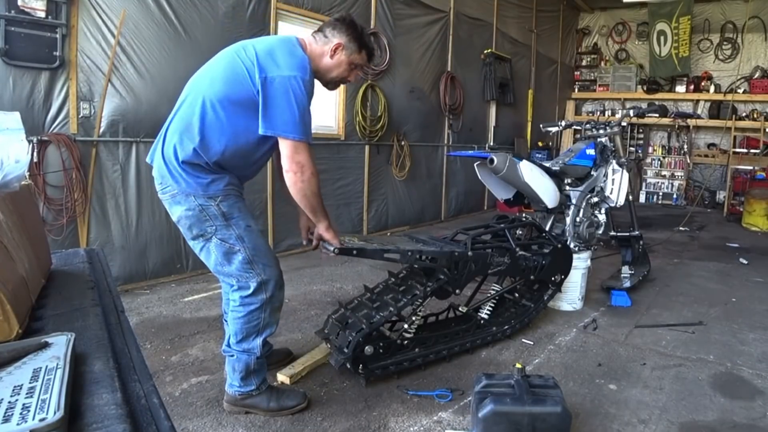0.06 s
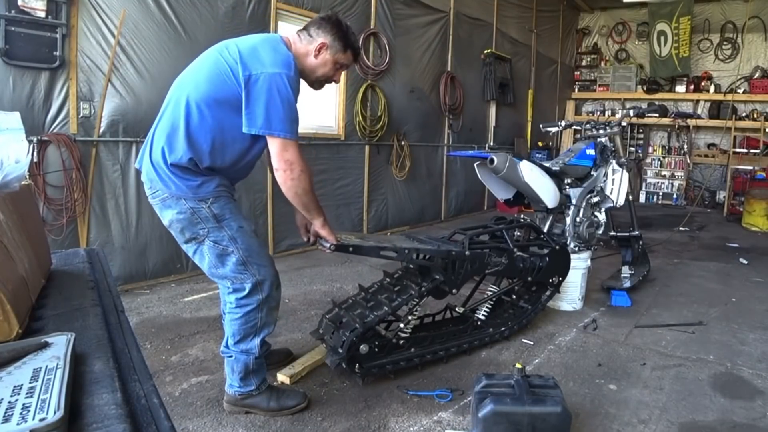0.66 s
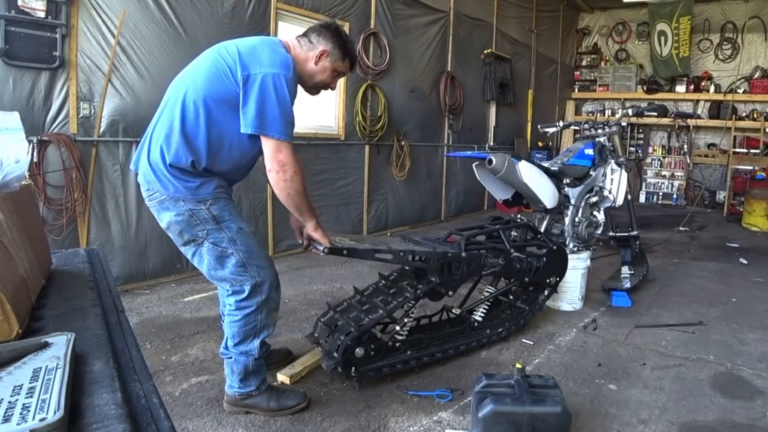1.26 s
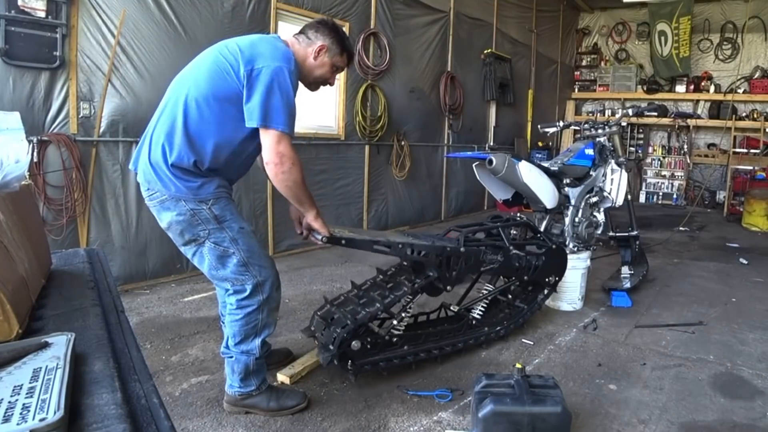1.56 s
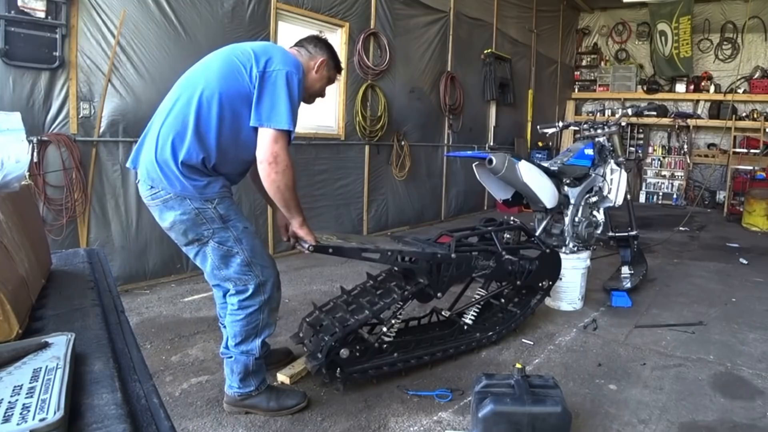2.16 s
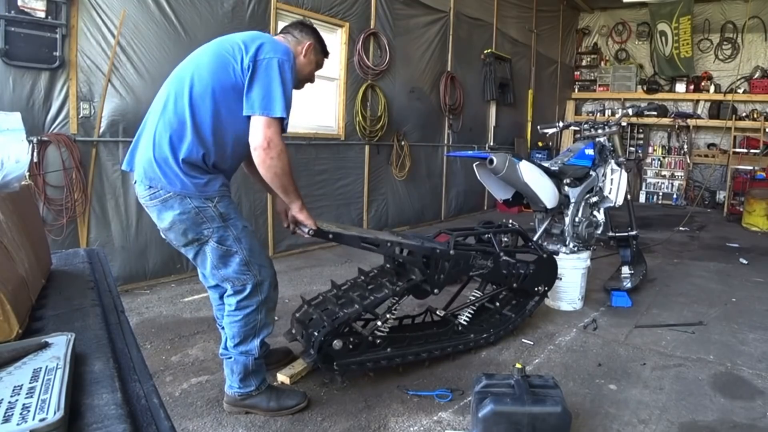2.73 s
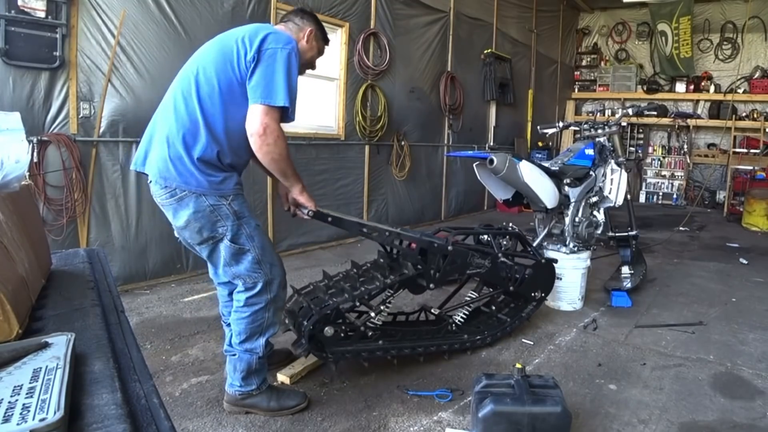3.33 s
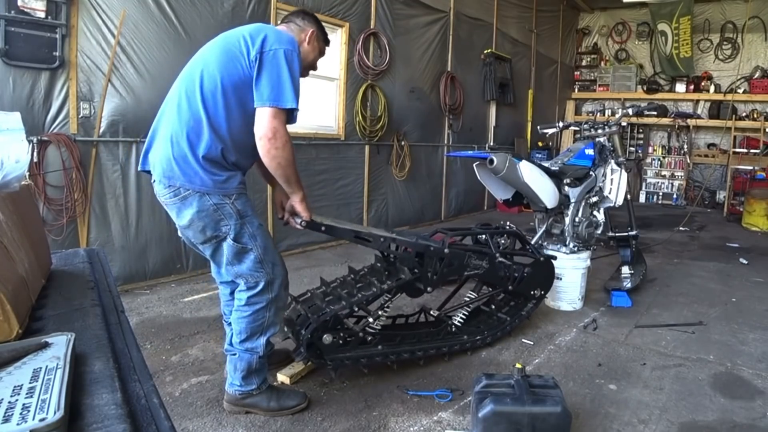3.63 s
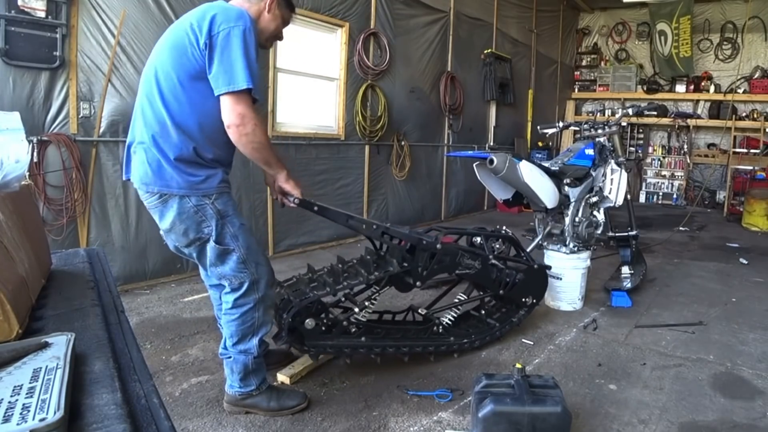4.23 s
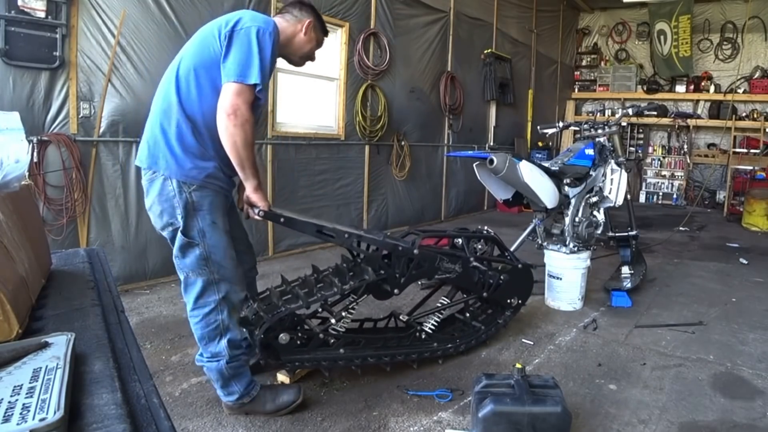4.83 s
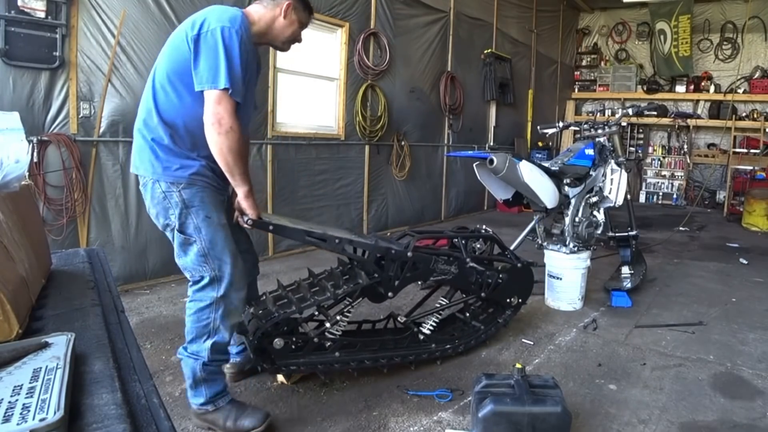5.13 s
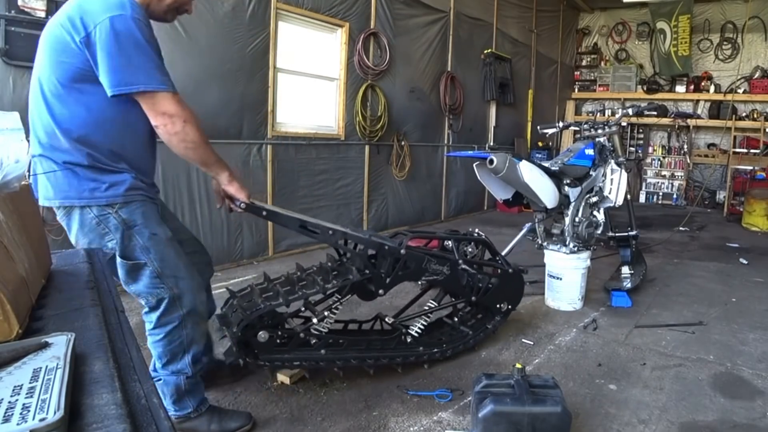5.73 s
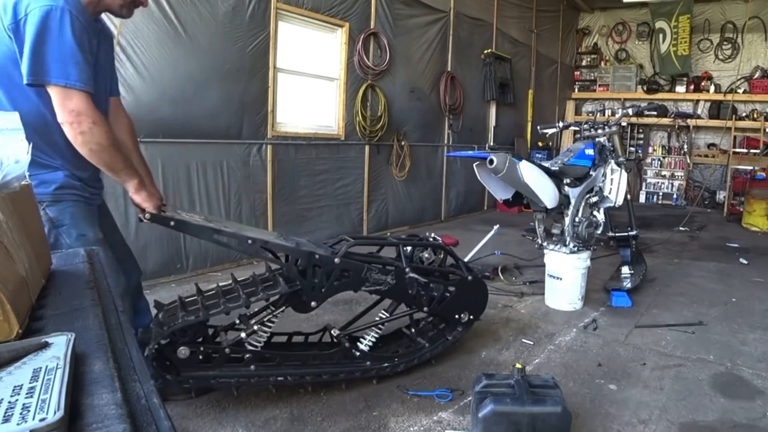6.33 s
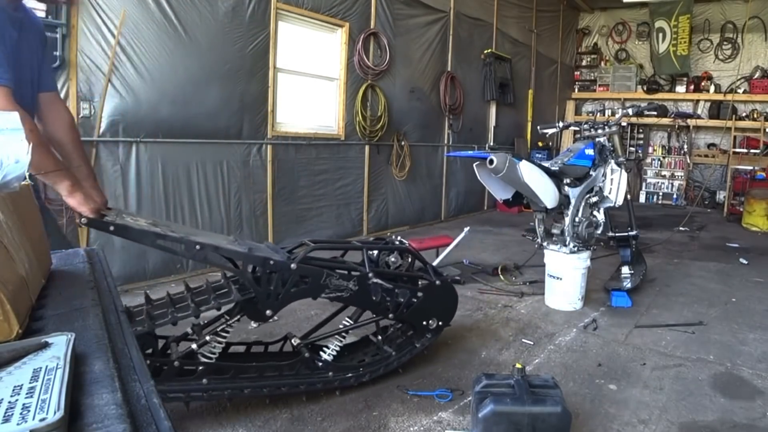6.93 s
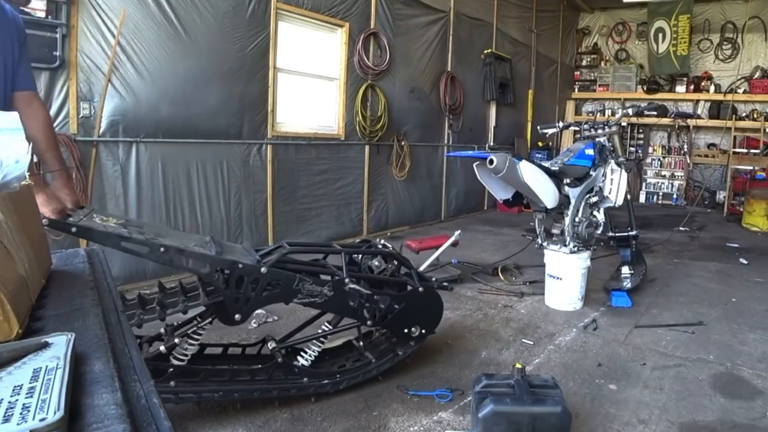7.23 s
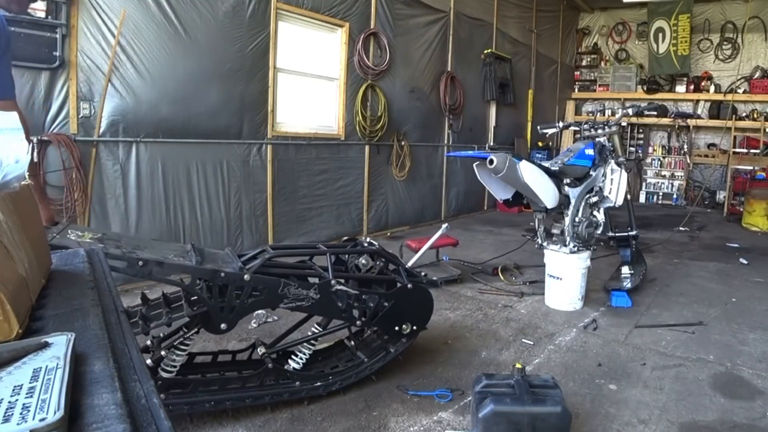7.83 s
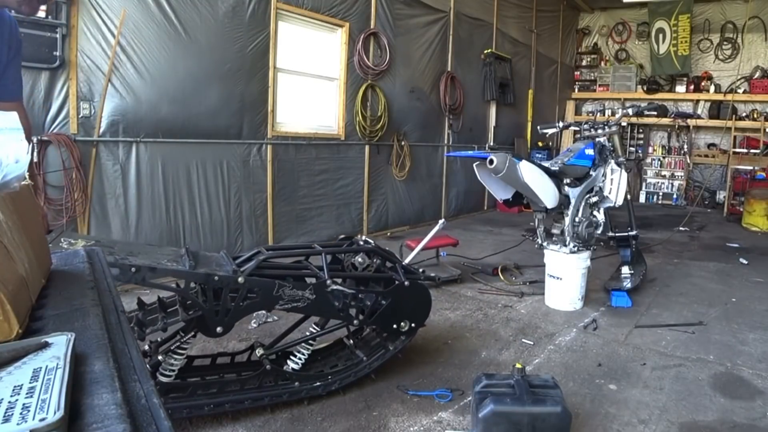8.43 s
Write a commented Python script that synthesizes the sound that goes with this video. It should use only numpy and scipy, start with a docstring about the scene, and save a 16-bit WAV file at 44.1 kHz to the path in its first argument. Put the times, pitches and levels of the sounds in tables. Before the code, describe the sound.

From the start, a metal frame with a rubber track clanks, chatters and rings irregularly as it is rocked, with brief skids on concrete. The loudest cluster of clanks comes between 1.4 and 2 seconds, with another near 2.5. Low puffs of air hit the microphone around 1.8 seconds and flutter more softly until just after 3. From about 3.9 to 4.5 seconds the track is dragged with a gritty scrape. A longer pull runs from 5.3 to 7.4 seconds, grinding in tiny jerks while grit crackles and small stones snap, most sharply at 6.4, with a high metal ping at 6.6. A boot scuffs softly near 7.5 seconds, and at 7.7 the metal tow arm lands with a bright, ringing clash. Each contact has a short garage echo, over faint steady hiss and rumble that remain until the end, at about 8.5 seconds.

```python
"""A rubber track on a metal frame is rocked off a wooden block and dragged over a concrete garage floor.
For three seconds the frame clanks and rings between short skids; a draught puffs on the microphone.
Two long pulls follow, near 4 s and from 5.3 s: the lugs grind in tiny jerks, grit crackles, stones snap.
A boot scuffs, and at 7.7 s the tow arm drops with a bright clash.
The garage answers every contact, over a faint bed of hiss and rumble."""
import sys
import numpy as np
from scipy import signal
from scipy.fft import rfft, irfft, next_fast_len
from scipy.io import wavfile
from scipy.ndimage import map_coordinates

SR = 44100
rng = np.random.default_rng(int(sys.argv[2]) if len(sys.argv) > 2 else 0)


def int16_out(signal):
    """Quantize to a 16-bit WAV file."""
    q = np.round(np.clip(np.atleast_2d(signal).T, -1, 1) * 32767)
    wavfile.write(sys.argv[1], SR, q.astype(np.int16))


N = 373968

# effort of the two long pulls, one curve each: (time [s], level [dB])
PULL_CURVES = [
    [(3.87, -77), (3.945, -42), (4.09, -45), (4.235, -33.5), (4.31, -33.5), (4.445, -45.5), (4.58, -73)],
    [(5.33, -71), (5.5, -49), (5.65, -34), (5.76, -33), (6.09, -39), (6.46, -45), (6.6, -40.5),
     (7.0, -37.5), (7.28, -42), (7.4, -65)],
]
# colour of lugs and grit on concrete: (frequency [Hz], level [dB])
CONCRETE_TONE = [(88, -57), (150, -44.5), (176, -18), (227, -19), (297, -12.5), (331, -13.5), (403, -6.5),
                 (528, -9), (598, -11), (1100, -1), (2520, -10), (3880, -8.5), (8100, -14), (10400, -21.5),
                 (11000, -24.5), (14300, -61), (22000, -120)]


def frame_clanks():
    """The rocking frame knocks, chatters and rings."""
    # contacts: (time [s], level [dB], thud re level [dB], brightness [dB])
    hits = [(0.076, -22.5, -5, -4), (0.089, -31, -0.5, 5), (0.167, -30.5, -25, 1.5), (0.254, -40.5, -16, 1),
            (0.325, -29.5, -16, -14.5), (0.403, -45.5, 3, 5), (0.445, -50, 2, 3), (0.706, -40, -1.5, -1.5),
            (0.751, -30, -10.5, -9.5), (0.824, -39.5, -1, -8), (1.296, -58, 12, -14),
            (1.455, -22.5, -8.5, 2.5), (1.473, -24.5, -11, -8), (1.597, -32, -6, -4.5),
            (1.688, -30.5, -19, 2.5), (1.708, -20, -9.5, -3), (1.765, -26.5, -1.5, -2.5),
            (1.78, -24.5, -17, -0.5), (1.801, -23, -22, -5.5), (1.841, -29, -19, 10.5),
            (1.874, -28.5, -11.5, 1), (1.942, -33, -12, 3), (2.492, -31, -17, 2), (2.542, -29, -12, 6.5),
            (2.582, -32, -9, 0), (2.969, -36, -22, -10), (3.886, -43.5, -31, 0)]
    # frame resonances: (frequency [Hz], level [dB], t60 [s])
    modes = [(413.6, 8, 0.17), (468, -14, 0.72), (841, 4.5, 0.1), (886, 4, 0.26), (960, -2.5, 0.37),
             (1292, 3, 0.37), (2780, -1, 0.2), (2800, -5.5, 0.34), (3080, -27, 0.28), (3100, -17, 0.24),
             (4520, -9, 0.34), (4543, -8, 0.14), (5060, -4, 0.29), (5510, -7, 0.26), (5330, -23, 0.19),
             (6630, -14, 0.23), (6500, 6, 0.22), (6940, -12, 0.23), (7290, 0.5, 0.5), (7140, -19, 0.16),
             (7180, -12, 0.087), (7385, 0, 0.3), (7760, 4, 0.05), (7930, -16, 0.087), (8408, 14, 0.089),
             (8500, 5, 0.087), (8000, 11, 0.086), (9940, -27, 0.1)]
    # clatter colour: (frequency [Hz], level [dB])
    tone = [(59, -47), (100, -23.5), (267, -12), (381, -7), (429, -3), (674, -5), (853, 0.5), (1040, -3.5),
            (1340, -3.5), (1730, -10), (2520, -16), (2890, -12.5), (4820, -14), (8030, -8.5), (11000, -21),
            (14300, -59), (22000, -120)]
    return metal(hits, modes, tone, gain_db=-6, ring_db=-9, clatter_t60=0.12,
                 chatter_db=3.5, rise_s=0.0018, wet_db=-2.5)


def paired_rings(gain_db, rise_s, wet_db):
    """Struck steel sings with a beating pair of modes: mostly the side rail, and at 7.7 s the tow arm."""
    # close bending modes: (frequency ratio, level [dB], t60 [s])
    mode_pair = [(1, -12, 0.12), (1.025, -5.5, 0.14)]
    # blows that leave a ring, the last one on the tow arm: (time [s], level [dB], pitch [Hz])
    blows = [(0.329, -27.5, 889), (1.804, -14, 883), (1.841, -41, 2880), (2.544, -42, 830),
             (2.544, -24, 2790), (6.605, -23, 4760), (7.702, -26.5, 1164)]
    out, t = np.zeros((2, N)), seconds(.35)
    for s, db, hz in blows:
        ring = ringing(np.multiply(mode_pair, [hz, 1, 1]), t)
        add(out, s, garage(amp(db + gain_db) * ring * (1 - np.exp(-t / rise_s)), wet_db))
    return out


def link_clinks():
    """A small suspension link clinks as it is jolted."""
    # jolts: (time [s], level [dB], thud re level [dB], brightness [dB])
    hits = [(0.752, -34, -15, -14), (1.119, -37.5, -10.5, -16.5), (1.458, -25.5, -17, 1)]
    # link resonances: (frequency [Hz], level [dB], t60 [s])
    modes = [(810, -10, 0.77), (1348, -20, 0.33), (1938, 5, 0.16), (2670, 2, 0.078), (2760, -13, 0.92),
             (3260, -14, 0.092)]
    # clatter colour: (frequency [Hz], level [dB])
    tone = [(180, -22), (300, -9), (719, -6.5), (915, -7.5), (1670, -8), (1910, -2), (2790, 1), (3100, -8),
            (3400, -11), (11000, -37), (14300, -69), (22000, -120)]
    return metal(hits, modes, tone, gain_db=-5, ring_db=-16.5, clatter_t60=0.092,
                 chatter_db=5, rise_s=0.0044, wet_db=1)


def arm_drop():
    """The tow arm touches, then lands with a bright clash."""
    # contacts: (time [s], level [dB], thud re level [dB], brightness [dB])
    hits = [(7.668, -42.5, -20, 15), (7.689, -30, -26, 16), (7.701, -24.5, -26, 7.3)]
    # arm resonances: (frequency [Hz], level [dB], t60 [s])
    modes = [(2650, 6, 0.3), (3580, -9, 0.33), (4700, -7, 0.31), (5230, -11, 0.4), (5520, 2, 0.2),
             (5430, -10, 0.48), (5870, 6, 0.25), (5850, -7, 0.37), (6390, -13, 0.38), (6627, -6, 0.45),
             (6650, 1, 0.39), (7340, -12, 0.31), (7550, -14, 0.28)]
    # clatter colour: (frequency [Hz], level [dB])
    tone = [(88, -57), (150, -19), (620, -13), (770, -7.5), (889, -10.5), (1160, -1), (1640, -19),
            (2220, -3), (3610, -0.5), (4170, -9.5), (5970, -3.5), (7280, -9), (8100, -6.5), (8870, -16),
            (11000, -16.5), (14300, -50), (22000, -120)]
    return metal(hits, modes, tone, gain_db=-7.5, ring_db=-16.5, clatter_t60=0.11,
                 chatter_db=2.5, rise_s=0.0014, wet_db=-6.5)


def metal(hits, modes, tone, gain_db, ring_db, clatter_t60, chatter_db, rise_s, wet_db):
    """Loose metal parts chatter for a moment at each contact and leave their modes ringing."""
    out, t = np.zeros((2, N)), seconds(0.45)
    attack = 1 - np.exp(-t / rise_s)
    for s, db, thud_db, bright_db in hits:
        chatter = unit(rng.standard_normal(len(t)) * amp(chatter_db * wobble(362, len(t))))
        clatter = unit(coloured(chatter, tone)) * fade(t, clatter_t60)
        hit = (clatter + amp(ring_db) * ringing(modes, t)) * attack
        add(out, s, garage(contact(hit, gain_db + db, thud_db, bright_db), wet_db))
    return out


def ringing(modes, t):
    """The modes of a metal part, struck at a new spot."""
    hz, db, t60 = np.transpose(modes)[:, :, None]
    strength = amp(db + 4 * rng.standard_normal(db.shape))
    phase = 2 * np.pi * rng.random(db.shape)
    # the shifting load of the belt detunes the modes a little from blow to blow
    detune = 1 + .003 * rng.standard_normal(db.shape)
    ring = np.sum(strength * fade(t, t60) * np.sin(2 * np.pi * hz * detune * t + phase), axis=0)
    return ring / np.sqrt(np.sum(strength ** 2) / 2)


def contact(hit, db, thud_db, bright_db):
    """Voice a hit: weight adds thud, a harder contact adds sizzle and some clang."""
    clang_db = -1.5 + 0.48 * bright_db
    gains = amp(db + np.array([thud_db, 0, clang_db, bright_db]))
    head = SR // 40  # each band's level is set over the first 25 ms
    return sum(gain * band / np.sqrt(np.mean(band[:head] ** 2) + 1e-20)
               for gain, band in zip(gains, registers(hit)))


def long_pulls():
    """The track is hauled twice; one effort drives grinding and grit, but the grit swells less."""
    grinding = sum(amp(np.interp(np.arange(N) / SR, *np.transpose(pull), left=-120, right=-120))
                   for pull in PULL_CURVES)
    pivot = amp(-41.5)  # the two envelopes cross here
    crushing = pivot * (grinding / pivot) ** 0.8
    return drag(grinding, crushing, grind_db=0, grit_db=-2.5, body_db=-3,
                lug_db=-4, lug_hz=1127, lug_q=4.8, judder_db=2.1, wet_db=-9)


def short_skids():
    """The rocked track skids: each slide builds up, holds briefly and stops."""
    # slides: (start [s], hold [s], level [dB], grit re level [dB])
    slides = [(0.033, 0.04, -51, 0), (1.443, .01, -47.5, -6), (2.476, 0.02, -35, -10),
              (2.969, 0.045, -39.5, -6.5), (7.68, 0.013, -39.5, 4)]
    grinding, crushing = np.zeros((2, N))
    for s, hold, db, grit_db in slides:
        slide = amp(db) * swell(s, hold, rise_db_per_s=382, fall_db_per_s=402)
        grinding += slide
        crushing += amp(grit_db) * slide
    return drag(grinding, crushing, grind_db=-3, grit_db=-3.5, body_db=3.5,
                lug_db=2, lug_hz=1140, lug_q=4.7, judder_db=2.5, wet_db=0.5)


def drag(grinding, crushing, grind_db, grit_db, body_db, lug_db, lug_hz, lug_q, judder_db, wet_db):
    """Lugs grind over the concrete: jerks shake the track, and crushed grit crackles above."""
    jerks = slips(per_s=1100, spread_db=4, bed_db=-1.5) * amp(judder_db * wobble(45))
    body, grind, _, _ = registers(coloured(jerks, CONCRETE_TONE))
    # each lug that springs free gives a short hollow pop
    releases = slips(per_s=450, spread_db=4, bed_db=-11)
    pops = unit(signal.lfilter(*signal.iirpeak(lug_hz, lug_q, SR), releases))
    crackle = jerks + slips(per_s=350, spread_db=2.5, bed_db=-11)
    grit = unit(sum(registers(coloured(crackle, CONCRETE_TONE))[2:]))  # above 2 kHz
    track = unit(unit(grind + amp(body_db) * body) + amp(lug_db) * pops)
    scrape = amp(grind_db) * grinding * track + amp(grit_db) * crushing * grit
    return garage(scrape * amp(1.5 * wobble(17)), wet_db)[:, :N]


def slips(per_s, spread_db, bed_db, life_s=0.0016):
    """Tiny stick-slip jerks of very unequal size, each a crumbling burst, over even rubbing."""
    sizes = amp(spread_db * np.minimum(rng.exponential(size=N), 4.5))
    slipping = rng.random(N) < per_s / SR
    power = signal.lfilter([1], [1, -np.exp(-2 / (life_s * SR))], (sizes * slipping) ** 2)
    return np.sqrt(power / power.mean() + amp(2 * bed_db)) * rng.standard_normal(N)


def snaps(gain_db, wet_db):
    """Stones crack and lugs slip free."""
    # the loudest snaps: (time [s], level [dB], brightness [dB], t60 [s])
    cracks = [(0.877, -40, -10, 0.054), (0.917, -40, -12.5, 0.057), (1.017, -47.5, -2, 0.084),
              (3.129, -51.5, 0.5, 0.044), (3.259, -53.5, -2, 0.045), (3.43, -40.5, -18.5, 0.1),
              (3.923, -35, -18, 0.054), (3.995, -37, -3, .055), (4.287, -36, 7.5, 0.042),
              (4.415, -34.5, -11, .03), (4.949, -51.5, -9, 0.1), (5.127, -50, -29, .05),
              (5.382, -47, -21, 0.033), (5.47, -38, -6.5, 0.054), (5.54, -40, -9, .04),
              (5.612, -32.5, -6, .035), (5.645, -38.5, 2.5, .035), (5.762, -28, -9, .045),
              (5.986, -41.5, 7, .04), (6.193, -34, -6, .04), (6.399, -21.5, -8.5, 0.024),
              (6.604, -32, 12.5, 0.082), (6.91, -31, -1, 0.033), (6.925, -31, -10, 0.026),
              (7.03, -32.5, -8, .045), (7.109, -33, 0, 0.062), (7.251, -31, -7.5, .045),
              (7.346, -47, 7, 0.043)]
    out = np.zeros((2, N))
    for s, db, bright_db, t60 in cracks:
        add(out, s, garage(crack(gain_db + db, bright_db, t60), wet_db))
    return out


def crumbs(per_s, gain_db, spread_db, bright_db, bright_spread_db, t60, wet_db):
    """Smaller stones burst at random during the pulls, as loud as the pull is hard."""
    out = np.zeros(N)
    for pull in PULL_CURVES:
        s, db = np.transpose(pull)
        length = s[-1] - s[0]
        for when, size, hardness in rng.random((round(per_s * length), 3)):
            at = s[0] + when * length
            level_db = np.interp(at, s, db) + gain_db + spread_db * (size - .5)
            add(out, at, crack(level_db, bright_db + bright_spread_db * (hardness - .5), t60))
    return garage(out, wet_db)[:, :N]


def crack(db, bright_db, t60, softness=.038):
    """One short dead knock; a longer one also starts more softly."""
    t = seconds(.15)
    burst = rng.standard_normal(len(t)) * fade(t, t60) * (1 - np.exp(-t / (softness * t60)))
    return contact(coloured(burst, CONCRETE_TONE), db, thud_db=-15, bright_db=bright_db)


def boot_scuff(gain_db, wet_db):
    """A boot sole wipes once over dust."""
    # colour of the wipe: (frequency [Hz], level [dB])
    tone = [(120, -58), (200, -27), (289, -8.5), (495, -11), (715, -6), (1350, -10), (2470, -3.5),
            (2880, -6.5), (3760, -4.5), (11000, -20.5), (14300, -54), (22000, -120)]
    wipe = amp(gain_db) * swell(start=7.464, hold=0, rise_db_per_s=342, fall_db_per_s=380)
    return garage(wipe * noise(N, tone), wet_db)[:, :N]


def draught(puff_db, flow_db, flow_hz, side_db, flutter_db, puff_rise_s):
    """Air drifts past the microphone in fluttering spells; strong eddies give quick low puffs."""
    # spells of moving air: (start [s], hold [s], level [dB])
    spells = [(2.203, 1.0, -61), (4.25, 0.16, -71.5), (6.206, 0.54, -76), (7.447, 0.34, -75.5),
              (8.394, .1, -65)]
    # the strongest eddies: (time [s], level [dB], centre [Hz])
    eddies = [(1.739, -23, 290), (1.774, -18.5, 417), (1.799, -24, 264.7), (1.844, -29, 260),
              (2.191, -44.5, 120), (2.355, -40.5, 250), (2.489, -37.5, 229), (2.659, -43, 215),
              (2.779, -45, 237), (2.988, -44, 330), (3.089, -39, 148), (7.367, -50, 160), (7.604, -47, 145),
              (8.004, -53, 143)]
    flow = sum(amp(db + flow_db) * swell(s, hold, rise_db_per_s=84, fall_db_per_s=27)
               for s, hold, db in spells)
    out = flow * amp(flutter_db * wobble(14)) * turbulence(N, flow_hz, side_db)
    age = seconds(0.31) / puff_rise_s
    puff = age * np.exp(1 - age)
    for s, db, hz in eddies:
        add(out, s, amp(db + puff_db) * puff * turbulence(len(puff), hz, side_db))
    return out


def turbulence(length, hz, side_db):
    """Low buffeting around hz: big eddies press on both microphone ports alike, smaller ones differ."""
    hump = [(1 / 8, -28), (1 / 2, -8), (1, 0), (2, -8), (4, -30), (12, -75)]  # (ratio, level [dB])
    mid = noise(length, np.multiply(hump, [0.91 * hz, 1]))
    side = amp(side_db) * noise(length, np.multiply(hump, [1.14 * hz, 1]))
    return np.array([mid + side, mid - side])


def garage(x, wet_db, build_s=0.002):
    """x with the room's answer, which builds up quickly and dies at each frequency's own speed."""
    # reverb decay: (frequency [Hz], t60 [s])
    decay_times = [(100, 0.8), (300, 0.71), (1000, 0.4), (4000, 0.52), (8000, 0.54), (11000, 0.49)]
    hz, t, spectra = signal.stft(rng.standard_normal((2, SR * 3 // 5)), SR, nperseg=256)
    envelope = fade(t, along(decay_times, hz)[:, None]) * (1 - np.exp(-t / build_s))
    _, tail = signal.istft(spectra * envelope, SR, nperseg=256)
    response = amp(wet_db) * diffuse(*tail) / np.linalg.norm(tail[0])
    response[:, 0] += 1  # the direct sound
    return signal.fftconvolve(x[None], response, axes=1)


def room_tone(gain_db):
    """The faint steady hiss and rumble of the garage."""
    # colour of the air: (frequency [Hz], level [dB])
    tone = [(15, -39), (25, -19), (138, -16.5), (241, -12), (336, -9.5), (391, -8), (603, -8),
            (1710, -13.5), (4750, -14), (5820, -15), (7130, -14.5), (10200, -22), (11000, -24),
            (14300, -54.5), (22000, -120)]
    mid, side = noise(N, tone), noise(N, tone)
    return amp(gain_db + wobble(2.9) / 2) * diffuse(mid, side)


def diffuse(mid, side):
    """Left and right of sound that arrives from all around."""
    # stereo width: (frequency [Hz], side re mid [dB])
    width = [(40, -9), (150, -8), (300, -11), (550, -5), (1200, -4), (2400, -3), (6000, -12.5), (11000, -7)]
    side = coloured(side, width)
    return np.array([mid + side, mid - side])


def registers(x):
    """The thud, knock, clang and sizzle bands of a sound; they add up to it."""
    below = [signal.sosfiltfilt(signal.butter(4, hz, fs=SR, output="sos"), x, padtype=None)
             for hz in (650, 2000, 4500)]
    return np.diff([0 * x, *below, x], axis=0)


def coloured(x, tone, size=4096):
    """x through the causal filter that has the given (Hz, dB) spectrum."""
    db = np.maximum(along(tone, np.fft.rfftfreq(size, 1 / SR)), -100)
    cepstrum = irfft(np.log(amp(db)))
    cepstrum[1:size // 2] *= 2  # fold to minimum phase
    cepstrum[size // 2 + 1:] = 0
    return signal.fftconvolve(x, irfft(np.exp(rfft(cepstrum))))[:len(x)]


def noise(length, tone):
    """Coloured noise at rms 1."""
    return unit(coloured(rng.standard_normal(length), tone))


def swell(start, hold, rise_db_per_s, fall_db_per_s):
    """Gain that reaches 1 at start, holds and falls away."""
    t = np.arange(N) / SR - start
    return amp(-rise_db_per_s * np.maximum(-t, 0) - fall_db_per_s * np.maximum(t - hold, 0))


def wobble(rate, length=N):
    """A smooth random curve, rate knots a second."""
    knots = rng.standard_normal(int(length * rate / SR) + 4)
    return map_coordinates(knots, [np.arange(length) * rate / SR])


def fade(t, t60):
    """Exponential decay, 60 dB down at t60."""
    return np.exp(-np.log(1000) * t / t60)


def along(points, hz):
    """(Hz, value) points read on a log axis."""
    knot_hz, values = np.transpose(points)
    return np.interp(np.log(hz + 1), np.log(knot_hz + 1), values)


def add(track, s, x):
    """Mix x into the track at time s."""
    start = max(round(s * SR), 0)
    part = track[..., start:start + x.shape[-1]]
    part += x[..., :part.shape[-1]]


def amp(db):
    """Decibels to gain."""
    return 10 ** (np.asarray(db) / 20)


def unit(x):
    """Scaled to rms 1."""
    return x / np.sqrt(np.mean(x ** 2) + 1e-20)


def seconds(length):
    """A time axis."""
    return np.arange(int(length * SR)) / SR


def scene():
    """Metal, floor and air in one room; frame and floor lean slightly right."""
    frame = frame_clanks() + paired_rings(gain_db=-4.5, rise_s=0.0011, wet_db=-13) + link_clinks()
    arm = arm_drop()
    floor = short_skids() + long_pulls() + snaps(gain_db=-7.5, wet_db=-3)
    floor += boot_scuff(gain_db=-38.5, wet_db=-3)
    air = room_tone(gain_db=-60)
    air += draught(puff_db=-8.5, flow_db=-1.5, flow_hz=137, side_db=1.5, flutter_db=2.5, puff_rise_s=.011)
    floor += crumbs(per_s=7, gain_db=-9, spread_db=3.5, bright_db=-2.5, bright_spread_db=21,
                    t60=0.041, wet_db=-4)
    return frame * amp([[-.4], [.4]]) + floor * amp([[-.2], [.2]]) + arm + air


def record(dry):
    """A steep high cut takes off the top treble."""
    cutoff_hz, half_width_hz = 11150, 250
    size = next_fast_len(N + SR // 2)
    edge = np.clip((np.fft.rfftfreq(size, 1 / SR) - cutoff_hz) / half_width_hz, -1, 1)
    high_cut = (1 - np.sin(edge * np.pi / 2)) / 2
    return irfft(rfft(dry, size) * high_cut, size)[:, :N]


dry = scene()
out = record(dry)
int16_out(out)
```